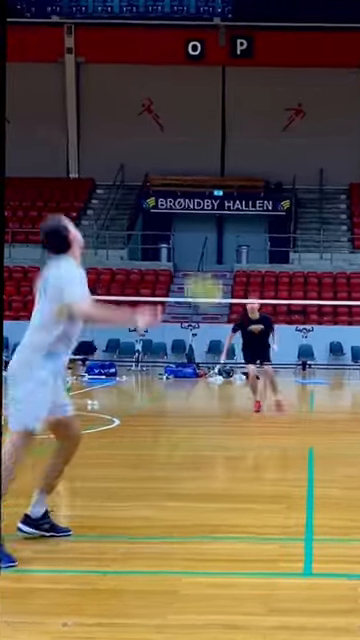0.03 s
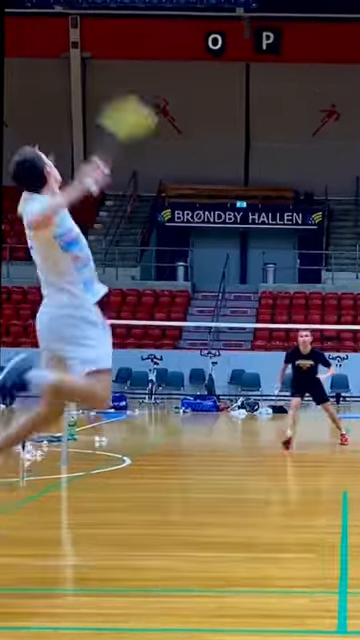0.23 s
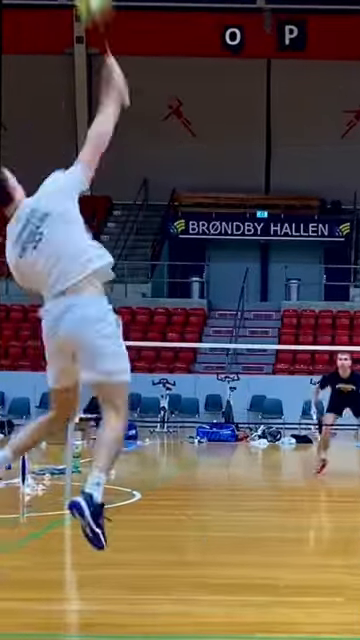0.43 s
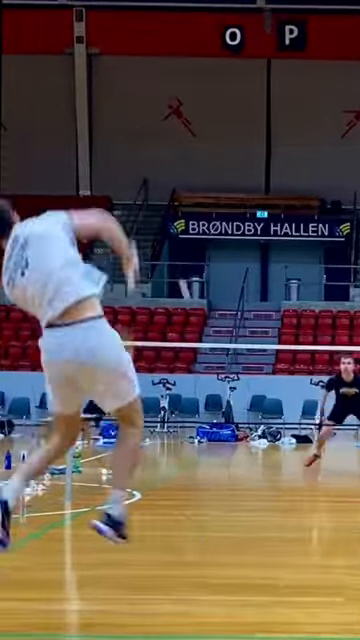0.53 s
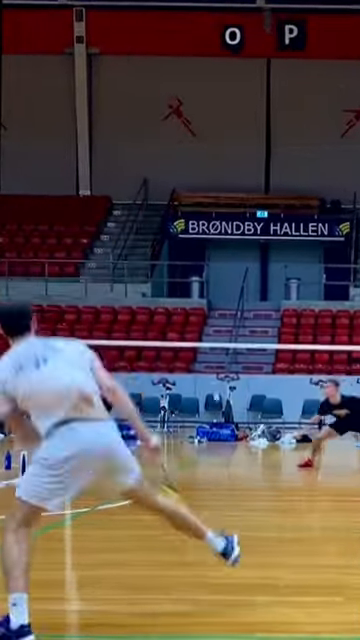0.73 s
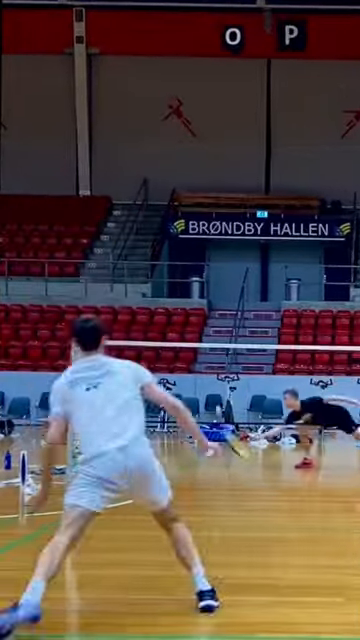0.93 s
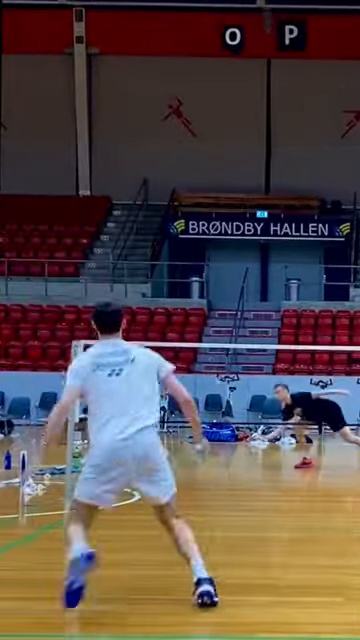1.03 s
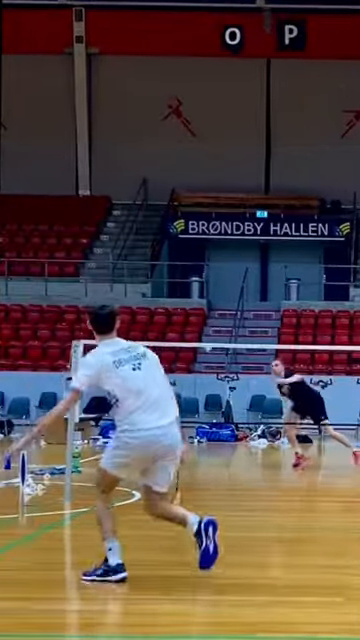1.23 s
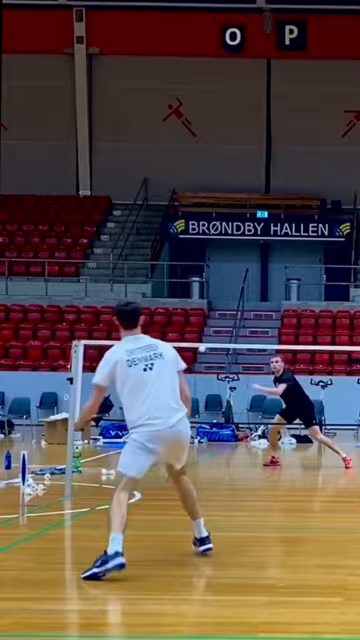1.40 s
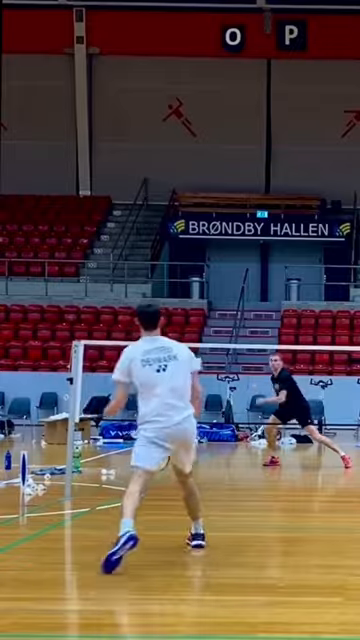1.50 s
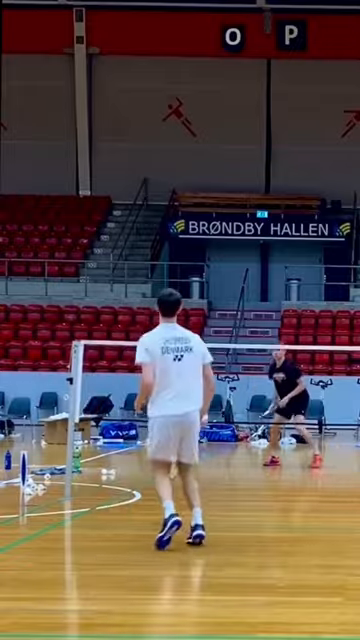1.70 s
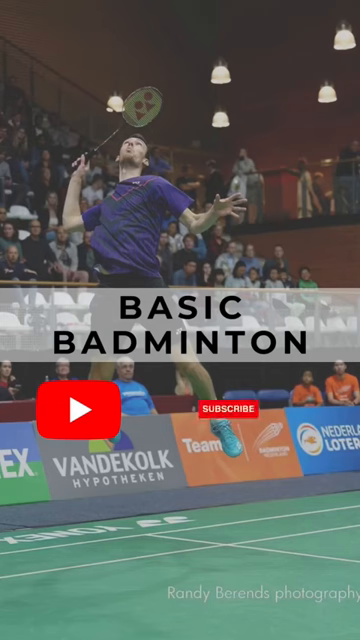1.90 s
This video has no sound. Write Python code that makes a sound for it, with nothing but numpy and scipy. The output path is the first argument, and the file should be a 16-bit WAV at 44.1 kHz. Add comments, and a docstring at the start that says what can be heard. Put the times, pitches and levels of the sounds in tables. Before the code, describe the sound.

A sharp badminton smash in an echoing hall, followed by thudding footsteps and shoe squeaks.

```python
"""A large, echoing sports hall with a sprung wooden floor: a badminton player makes a jump smash.
He pushes off, the swing swishes, and the impact on the shuttlecock excites the racket's modes with a
crack that reverberates. He lands on one foot, then the other, and steps back into court: soles slap
and squeak by stick-slip friction, a heel knocks, the floor resonates. Beneath it all are the
ventilation and the dying ring of the previous stroke."""
import sys
import numpy as np
from scipy import signal
from scipy.fft import rfft, irfft
from scipy.io import wavfile

SR = 44100
rng = np.random.default_rng(int(sys.argv[2]) if len(sys.argv) > 2 else 0)


def waveform_to_disk(signal):
    """Save audio, clipped to [-1, 1], as 16-bit WAV at the path in sys.argv[1]."""
    frames = np.transpose(np.atleast_2d(signal))
    scaled = np.clip(frames, -1, 1) * 32767
    samples = np.round(scaled).astype(np.int16)
    wavfile.write(sys.argv[1], SR, samples)


N = 85995
TIME = np.arange(N) / SR
FREQS = np.maximum(np.arange(N // 2 + 1) * SR / N, 1)
CUTOFF_HZ, SHOE_WET_DB = 17400, -5


def from_db(db):
    """Amplitude ratio of a level."""
    return 10 ** (np.asarray(db) / 20)


def rms_one(x):
    """Normalisation to unit rms."""
    return x / np.sqrt(np.mean(x ** 2) + 1e-20)


def at_hz(points, hz):
    """Interpolation on a log-frequency axis."""
    f, v = np.transpose(points)
    return np.interp(np.log(hz), np.log(f), v)


def rolloff_db(ratio, order):
    """Low-pass response: flat at small ratios, 6 dB down at ratio 1."""
    return -20 * np.log10(1 + ratio ** order)


def envelope(start, rise, hold, t60):
    """Linear attack, hold, then exponential damping by 60 dB in t60 seconds."""
    t = TIME - start
    decay = np.log(1000) * np.maximum(t - rise - hold, 0) / t60
    return np.clip(t / rise, 0, 1) * np.exp(-np.minimum(decay, 20))


def panned(x, db):
    """Direction by level difference, left minus right."""
    return x * from_db([[db / 2], [-db / 2]])


def waver(hz):
    """Random modulation: unit-rms noise, low-passed at hz."""
    return rms_one(irfft(rfft(rng.standard_normal(N)) / (1 + (FREQS / hz) ** 2), N))


def noise(db):
    """Partly coherent stereo noise of spectral shape db and unit rms: narrow bass, wide treble."""
    # spread of the sound field: f/Hz, side minus mid level/dB
    spread = [(60, -28.5), (92, -31.5), (140, -25.5), (210, -16), (330, -11.5), (500, -4.5), (770, 1),
              (1170, -2), (1790, -8), (2740, -2), (4190, -4), (6410, 4), (9810, -1.5), (15000, 0)]
    mid, side = rfft(rng.standard_normal((2, N)))
    width = from_db(at_hz(spread, FREQS))
    stereo = (mid + width * side * [[1], [-1]]) / np.sqrt(1 + width ** 2)
    return rms_one(irfft(from_db(db) * stereo, N))


def hall_ring(db, start, gap_s=0.012, build_s=0.03, flutter_db=1.5):
    """Diffuse field after a click of spectrum db: it builds up, flutters and decays band by band."""
    # diffuse echoes from the stands: delay/s, level over the ring/dB, rise/s, t60/s
    echoes = [(0.071, -9.5, 0.004, .12), (.185, 1, 0.015, .12)]
    # reverberation time: f/Hz, t60/s
    decay_times = [(80, 0.33), (300, 4.85), (1200, 3.83), (2600, 3.01), (5000, 1.45), (10000, 1.04),
                   (16000, 1.8)]
    spectrum = rfft(noise(db))
    swells = sum(from_db(level) * envelope(start + lag, rise, 0, t60)
                 for lag, level, rise, t60 in echoes)
    ring = noise(db) * swells
    edges = np.r_[0, np.geomspace(100, 16000, 18), SR]
    for low, high in zip(edges, edges[1:]):
        band = irfft(spectrum * ((FREQS >= low) & (FREQS < high)), N)
        ring += band * envelope(start + gap_s, build_s, 0, at_hz(decay_times, (low + high) / 2))
    return ring * from_db(flutter_db * waver(hz=117))


def hall(x, air_cut_hz=14400):
    """Reverberation: convolution with a unit-energy response; air absorbs the highest treble."""
    ring = hall_ring(rolloff_db(FREQS / air_cut_hz, 6), 0)
    return signal.fftconvolve(np.atleast_2d(x), ring / np.sqrt(np.sum(ring ** 2)), axes=1)[:, :N]


def walls(x, scatter_db=-8, band_hz=(340, 5500)):
    """Early reflections: each a band-limited specular copy with a short scattered tail."""
    # paths by walls and roof: delay/s, level/dB, left minus right/dB
    reflections = [(.0285, -17, 1), (.0372, -16.5, -1), (.053, -22, 2), (.0705, -21, -2), (.1235, -19, 1)]
    response = 0
    for lag, db, pan_db in reflections:
        scatter = rng.standard_normal((2, N)) * envelope(lag, 1 / SR, 0, t60=0.015)
        scatter /= np.sqrt(np.sum(scatter ** 2) / 2)
        specular = np.arange(N) == int(lag * SR)
        response += from_db(db) * panned(specular + from_db(scatter_db) * scatter, pan_db)
    response = signal.sosfilt(signal.butter(2, band_hz, "band", fs=SR, output="sos"), response)
    return signal.fftconvolve(np.atleast_2d(x), response, axes=1)[:, :N]


def background(hum_hz=461):
    """Ambient noise: the previous stroke's reverberation decays over ventilation and its faint hum."""
    # ring of the previous stroke: f/Hz, relative spectral level/dB
    earlier_spectrum = [(80, -7.5), (250, -2.5), (450, -2), (700, -1.5), (1300, -2.5), (1900, -6),
                        (2800, -3), (3900, -9), (6000, 0.5), (7400, -30.5), (8600, -8), (11800, -16),
                        (13200, -37.5), (16000, -36)]
    # ventilation and distant play: f/Hz, relative spectral level/dB
    ambient_spectrum = [(20, -25), (40, 6), (65, 13), (110, 7), (170, 6), (250, -8.5), (450, -10),
                        (700, -10.5), (1350, -9), (1900, -20.5), (2800, -13), (3900, -26), (5800, -23),
                        (7400, -56.5), (9000, -37), (12000, -45.5), (13500, -55.5), (16000, -47.5)]
    hum = np.sin(2 * np.pi * hum_hz * TIME + waver(hz=4.6))
    earlier = hall_ring(at_hz(earlier_spectrum, FREQS), start=-0.31)
    ambient = noise(at_hz(ambient_spectrum, FREQS))
    return from_db(-30) * earlier + from_db(-35) * ambient + from_db(-52) * hum


def high_hisses():
    """Band-limited noise: faint high hisses, the swish of the swing and a brief tick at a footstep."""
    # bands of hiss: t/s, level/dB, rise/s, t60/s, centre f/Hz, relative half-width
    hisses = [(.232, -38, 0.022, 0.15, 15000, .055), (.23, -57, .02, .12, 10600, .15),
              (0.416, -44, .036, .025, 11000, .25), (.917, -53, .005, .04, 11500, .25)]
    return sum(from_db(db) * envelope(s, rise, 0, t60) * noise(rolloff_db((FREQS / hz - 1) / width, 4))
               for s, db, rise, t60, hz, width in hisses)


def sole_squeaks(jitter=0.01817, flutter_db=3.5, third_db=-37, fourth_db=-32.5, walls_db=8):
    """Stick-slip friction: rubber soles give unsteady gliding tones with harmonics and a rasp."""
    # slips: t/s, length/s, first f/Hz, last f/Hz, level/dB, then relative octave/dB, rasp/dB, hall/dB
    slips = [(0.15, 0.017, 2820, 2754, -35.5, 2, -11, 6.5), (.604, 0.0089, 1467, 1434, -31, -20, -25, 10.5),
             (0.61, 0.014, 5740, 5400, -23.5, -31.5, -13, 3.5), (.616, .009, 3300, 3220, -30, -30, -18, -3),
             (0.613, 0.018, 2380, 2340, -28, 0, -25, 8), (0.658, 0.024, 2390, 2500, -32, -2, -21, 6),
             (1.206, .011, 3600, 3430, -23, -28.5, -15, -2), (1.2125, 0.006, 2920, 3100, -26, 1, -13, -4),
             (1.3875, 0.0038, 3050, 3350, -18.5, -14.5, -13, -2),
             (1.39, 0.009, 3400, 3050, -28.5, -11, -15, -1)]
    # scuffing rubber: f/Hz, relative spectral level/dB
    rasp_spectrum = [(1500, -9), (2700, 7), (3800, 13.5), (4500, -14.5), (6200, 7.5), (7500, -24),
                     (9500, 3), (11500, -1), (13500, -25), (16000, -25.5)]
    scuff = noise(at_hz(rasp_spectrum, FREQS))
    direct, to_hall = 0, 0
    for s, length, first_hz, last_hz, db, octave_db, rasp_db, wet_db in slips:
        progress = np.clip((TIME - s) / length, 0, 1)
        hz = (first_hz + (last_hz - first_hz) * progress) * (1 + jitter * waver(hz=708))
        phase = 2 * np.pi * np.cumsum(hz) / SR
        partials = enumerate((0, octave_db, third_db, fourth_db), 1)
        tone = sum(from_db(level) * np.sin(k * phase)
                   for k, level in partials if k * first_hz < CUTOFF_HZ)
        amplitude = from_db(db + flutter_db * waver(hz=375)) * np.sin(np.pi * progress)
        squeak = amplitude * (tone + from_db(rasp_db) * scuff)
        direct += squeak
        to_hall += from_db(wet_db) * squeak
    return direct + from_db(walls_db) * walls(direct) + hall(to_hall)


def sole_slaps():
    """Impact noise: a shoe meets the boards in a short slap, each with its own brightness."""
    # contacts: t/s, level/dB, t60/s, low-pass f/Hz
    contacts = [(0.1781, -26, 0.045, 3980), (0.685, -22.5, 0.16, 1650), (0.8068, -18, 0.022, 2370),
                (.833, -26.5, 0.028, 2025), (0.919, -24.5, 0.049, 686)]
    # sole on wood: f/Hz, relative spectral level/dB
    slap_spectrum = [(100, 9), (350, -8.5), (550, -1.5), (1000, 2), (1700, -6.5), (2500, 2), (5000, -17.5),
                     (12000, -14)]
    slaps = 0
    for s, db, t60, hz in contacts:
        burst = noise(at_hz(slap_spectrum, FREQS) + rolloff_db(FREQS / hz, 4))
        slaps += from_db(db) * envelope(s, rise=0.00032, hold=0.0019, t60=t60) * burst
    return slaps + from_db(SHOE_WET_DB) * hall(slaps)


def struck(modes, start):
    """Free vibration after a blow: a sum of damped modes, each rising in half a period."""
    return sum(from_db(db) * np.sin(2 * np.pi * hz * (TIME - start - lag))
               * envelope(start + lag, .5 / hz, 0, t60) for lag, hz, db, t60 in modes)


def heel_knock():
    """Modal ringing: a heel strikes the boards with a crisp, woody knock."""
    # modes of heel on boards: delay/s, f/Hz, relative level/dB, t60/s
    heel_modes = [(0, 1800, 0, 0.012), (0, 1424, 1.5, 0.012), (.001, 950, -5, .028), (.002, 638, -3, 0.02)]
    knock = from_db(-24.5) * struck(heel_modes, start=1.5132)
    return knock + walls(knock) + from_db(SHOE_WET_DB) * hall(knock)


def floor_booms(sag_s=0.017, octave_db=-21.5, wet_db=-10.5):
    """Loaded resonance: each footfall rings the sprung floor, whose pitch sags as the weight settles."""
    # foot loads: t/s, level/dB, first f/Hz, settled f/Hz, rise/s, hold/s, t60/s
    thuds = [(0.067, -29, 89, 85, 0.012, 0.051, 0.11), (0.144, -23.5, 128.7, 102.9, 0.052, 0.036, 0.071),
             (0.233, -22, 114, 84, 0.019, 0.011, 0.34), (0.327, -28.5, 66, 64.6, 0.026, 0.078, 0.17),
             (.690, -6, 127, 81.4, 0.006, 0.0033, 0.17), (0.722, -7, 85, 73, 0.0033, 0.015, 0.087),
             (.755, -24, 164, 148.4, 0.017, 0.013, 0.16), (.808, -11, 159, 129, 0.017, 0.0015, 0.028),
             (0.83, -6.5, 104, 98.75, 0.0058, 0.021, 0.049), (0.869, -17.5, 100, 91.5, 0.0024, 0.0069, .2),
             (0.956, -22, 89.5, 78, 0.0082, 0.009, 0.079), (1.057, -31.5, 84, 73.1, 0.0076, 0.019, 0.2),
             (1.194, -29.5, 63.2, 59.6, 0.009, 0.016, 0.19), (1.244, -21.5, 84.9, 70.6, 0.022, 0.0088, 0.1),
             (1.423, -36, 71.3, 67.5, 0.024, .04, .2), (1.519, -13, 130, 107, 0.003, 0.0024, 0.28),
             (1.558, -14, 113.6, 107.7, 0.0064, 0.0037, 0.23),
             (1.622, -22.5, 107.7, 94.8, 0.015, 0.0069, 0.21)]
    booms = 0
    for s, db, first_hz, last_hz, rise, hold, t60 in thuds:
        t = np.maximum(TIME - s, 0)
        phase = 2 * np.pi * (last_hz * t + (first_hz - last_hz) * sag_s * (1 - np.exp(-t / sag_s)))
        tone = np.sin(phase) + from_db(octave_db) * np.sin(2 * phase)
        booms -= from_db(db) * envelope(s, rise, hold, t60) * tone
    return panned(booms, db=-0.76) + from_db(wet_db) * hall(booms)


def smash(start=.4574, ring_db=-25):
    """Impulsive excitation: racket and shuttlecock ring and crack; the hall reflects and reverberates."""
    # modes of strings, cork and frame: delay/s, f/Hz, level/dB, t60/s
    racket_modes = [(0, 2590, -8.5, 0.016), (.0002, 1820, -11, 0.012), (.0012, 1001, -6.5, 0.019),
                    (.0016, 679, -8.5, .02), (.003, 460, -19, .012), (.0022, 294.7, -8, .02),
                    (.0036, 4550, -15.5, .009)]
    # the crack and its reflection off the floor: delay/s, level/dB, hold/s, t60/s
    arrivals = [(.0006, -7, 0.00036, 0.0048), (.0036, -12, 0.00082, 0.041)]
    # the crack: f/Hz, relative spectral level/dB
    crack_spectrum = [(150, -12.5), (400, 14.5), (1300, -0.5), (2800, 6.5), (3600, -7.5), (5200, 3),
                      (7200, -11), (9500, -3.5), (12000, -5), (13500, -5.5), (15200, -4), (16500, -27)]
    # the smash out in the hall: f/Hz, relative spectral level/dB
    ring_spectrum = [(80, -3.5), (250, 6.5), (440, 7.5), (550, 2), (800, 7.5), (1400, 10), (1600, 0),
                     (2050, -2), (2600, 1.5), (3500, -1.5), (5600, -9), (6400, -6), (7400, -63.5),
                     (8600, -11.5), (11800, -17.5), (13200, -50), (15500, -27.5)]
    bursts = sum(from_db(db) * envelope(start + lag, 0.00031, hold, t60)
                 for lag, db, hold, t60 in arrivals)
    hit = struck(racket_modes, start) + bursts * noise(at_hz(crack_spectrum, FREQS))
    return hit + walls(hit) + from_db(ring_db) * hall_ring(at_hz(ring_spectrum, FREQS), start)


def scene():
    """Superposition of all sources, heard from behind the court."""
    return (smash() + floor_booms() + sole_slaps() + heel_knock() + sole_squeaks()
            + high_hisses() + background())


def record(dry, left_lead_s=.00002, left_db=-0.3, low_cut_hz=32, peak=0.95, stop_s=1.772):
    """Band limiting and soft saturation; the left channel leads slightly, and the sound stops short."""
    left = from_db(left_db) * irfft(rfft(dry[0]) * np.exp(2j * np.pi * FREQS * left_lead_s), N)
    stereo = signal.sosfilt(signal.butter(2, low_cut_hz, "high", fs=SR, output="sos"), [left, dry[1]])
    rounded = peak * np.tanh(stereo / peak)
    gate = np.clip((stop_s - TIME) * 1000, 0, 1)
    return signal.sosfilt(signal.cheby2(12, 70, CUTOFF_HZ, fs=SR, output="sos"), rounded * gate)


dry = scene()
out = record(dry)
waveform_to_disk(out)
```